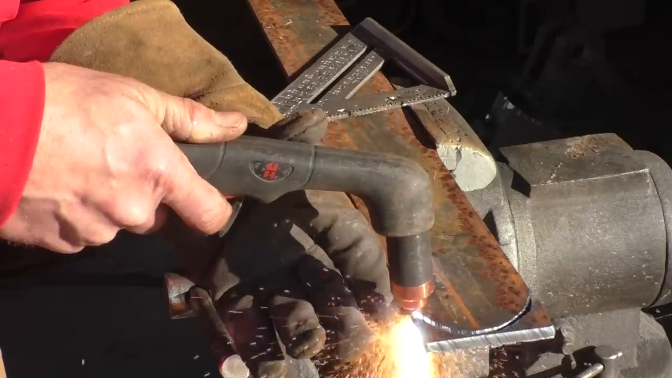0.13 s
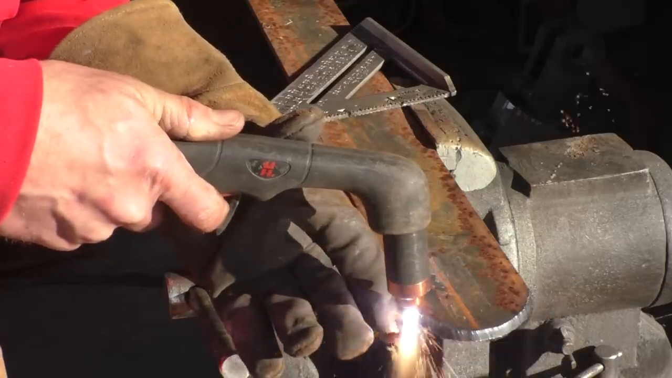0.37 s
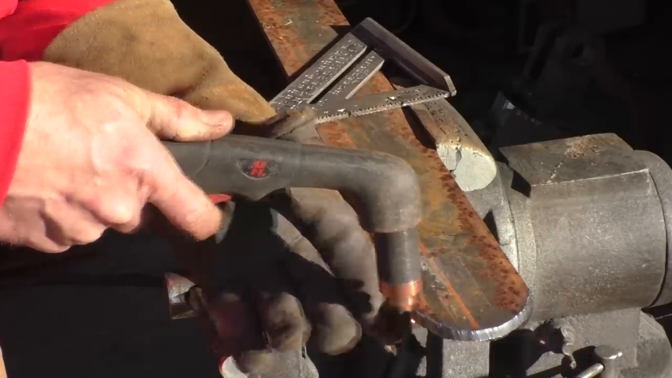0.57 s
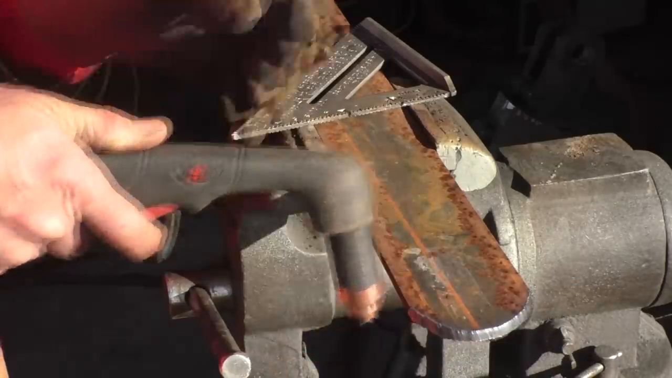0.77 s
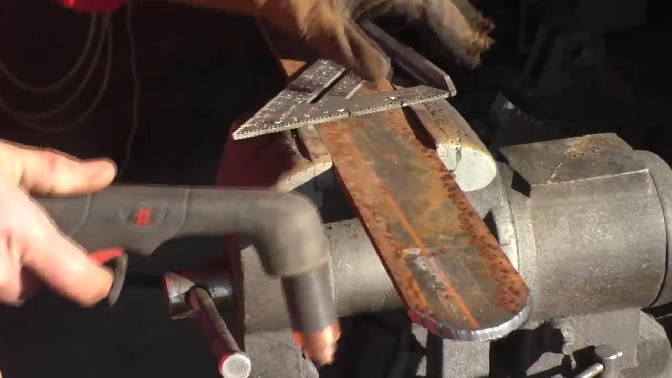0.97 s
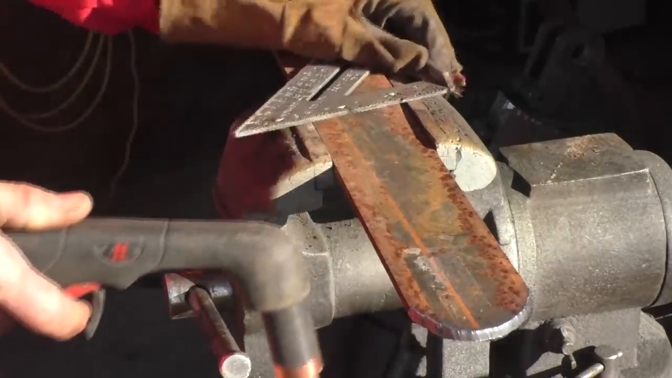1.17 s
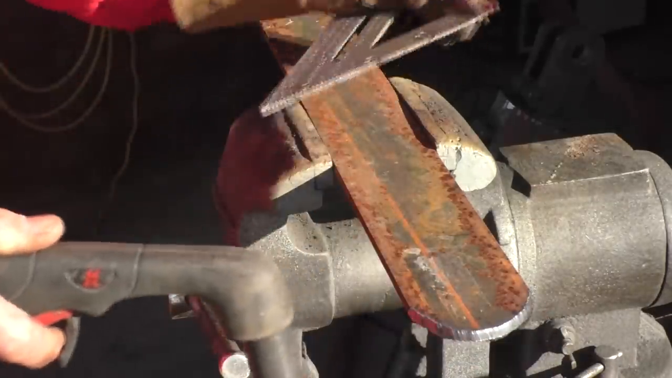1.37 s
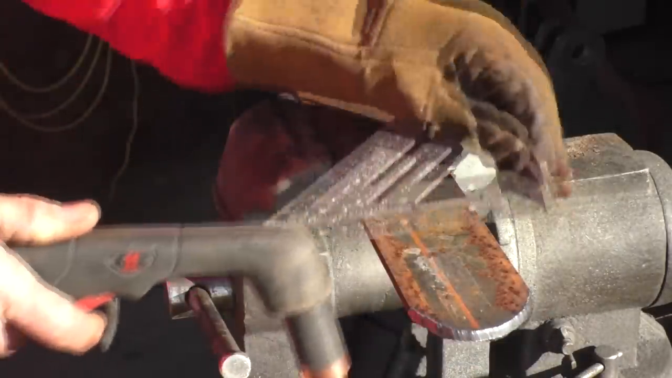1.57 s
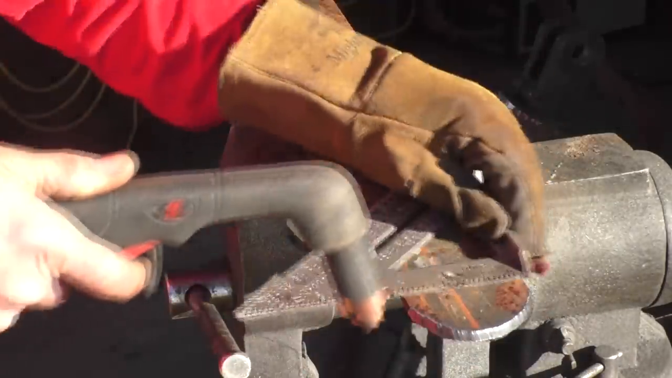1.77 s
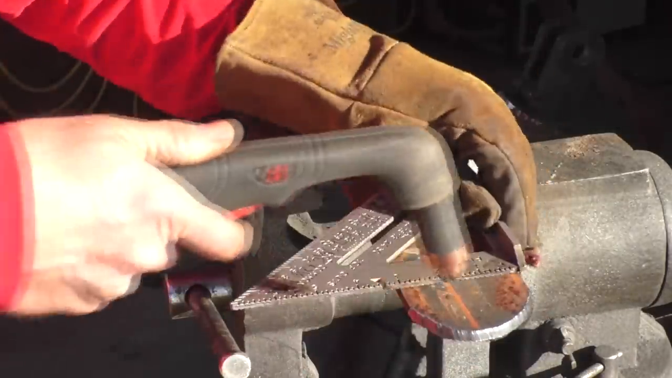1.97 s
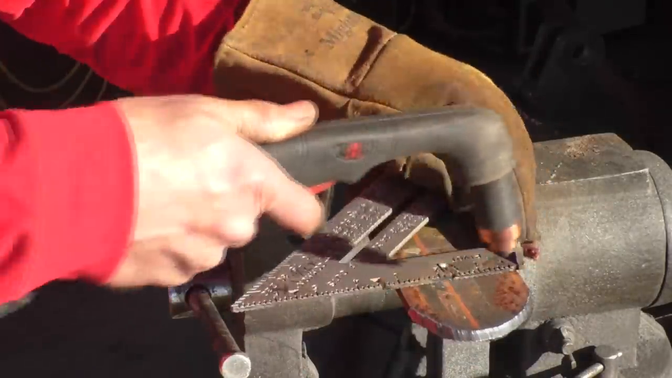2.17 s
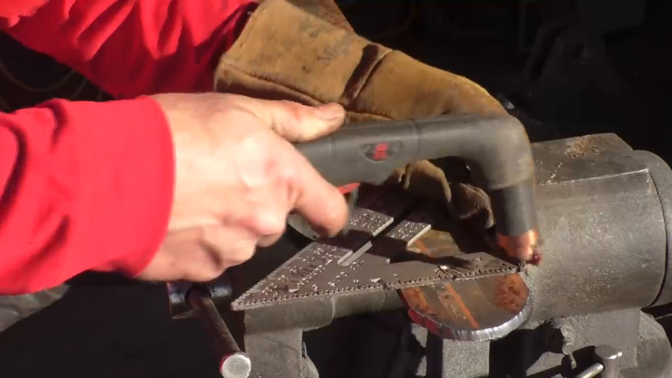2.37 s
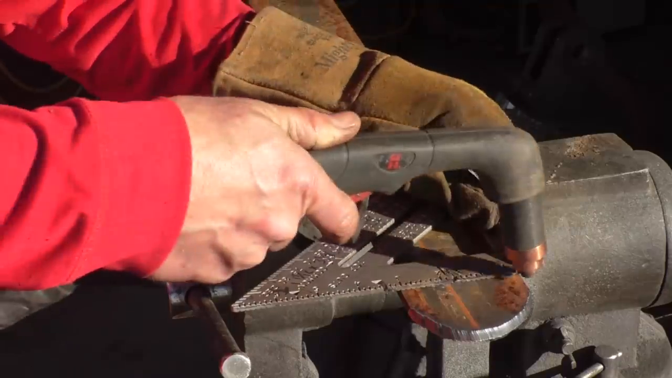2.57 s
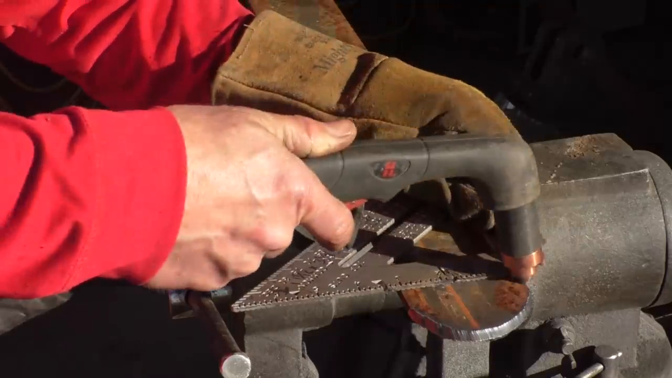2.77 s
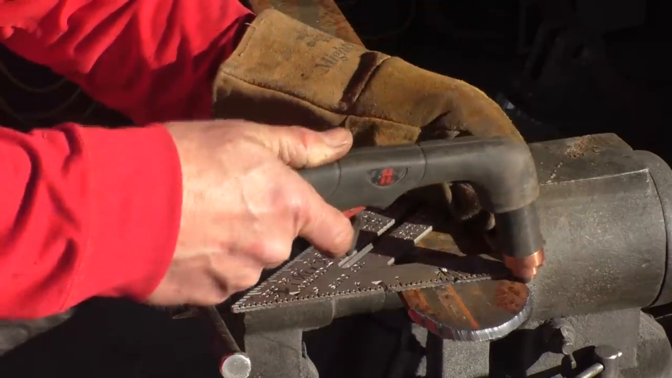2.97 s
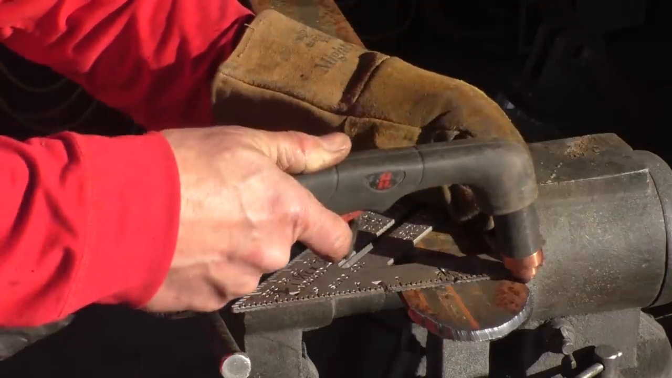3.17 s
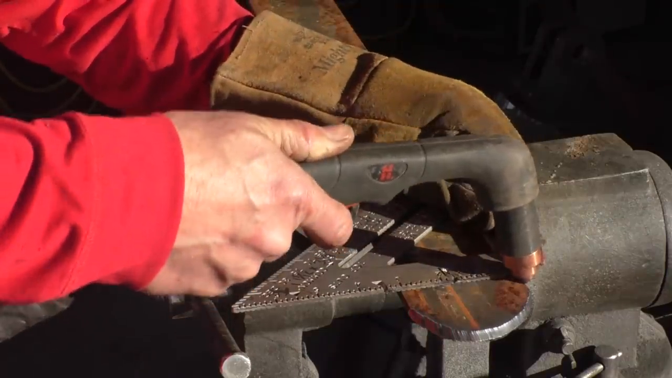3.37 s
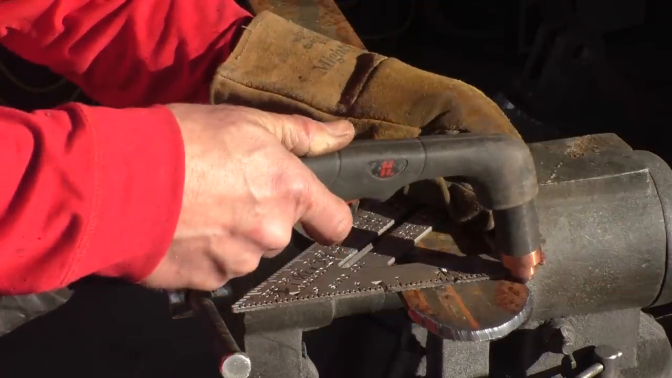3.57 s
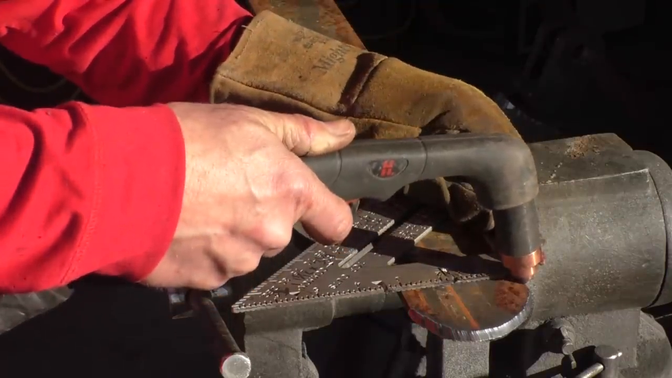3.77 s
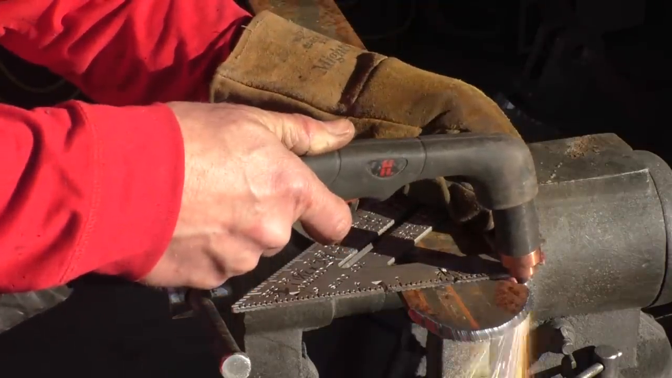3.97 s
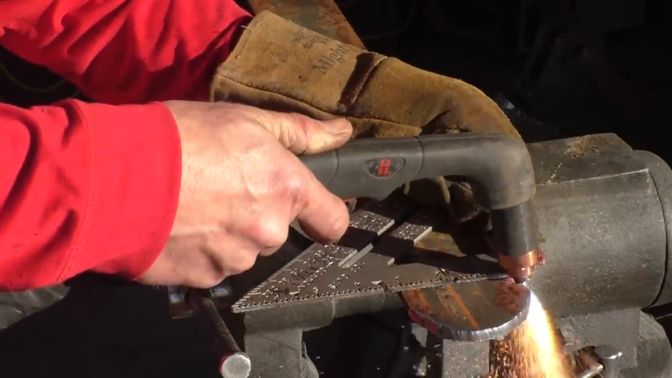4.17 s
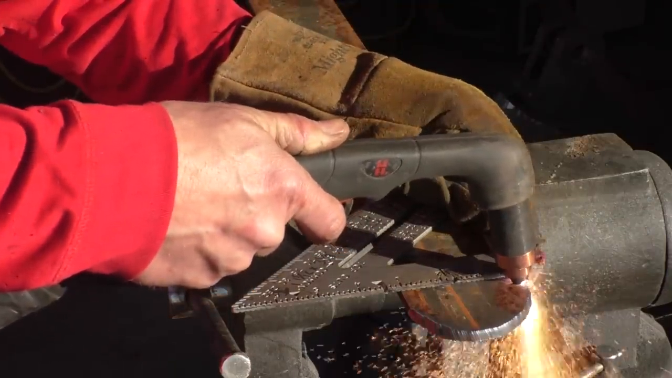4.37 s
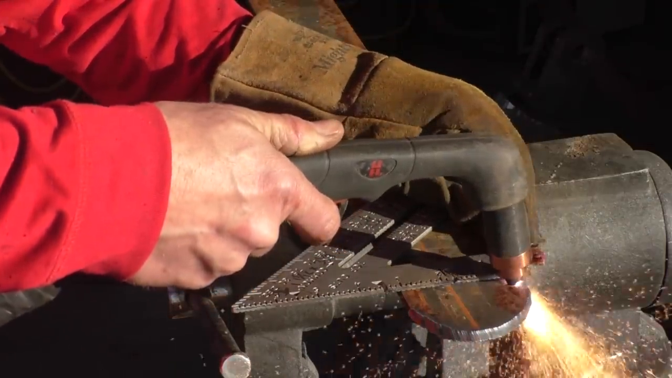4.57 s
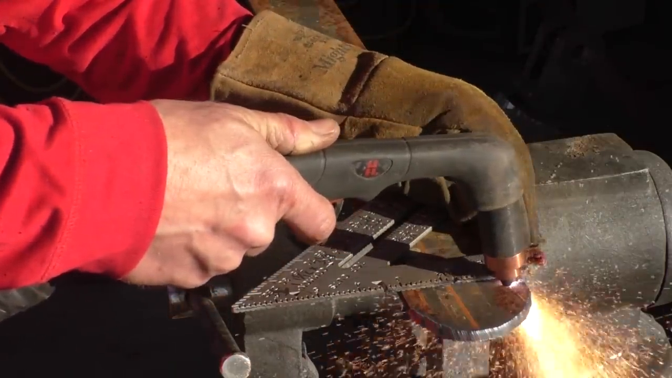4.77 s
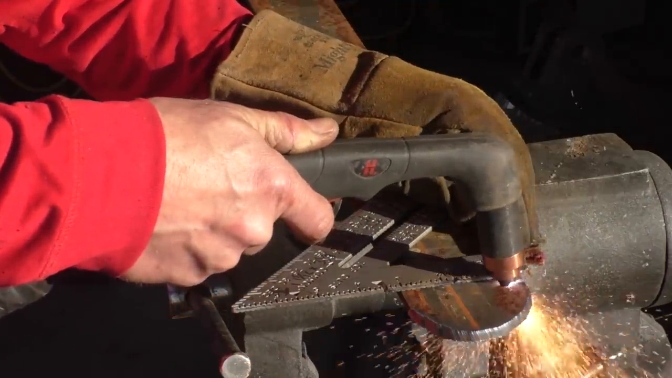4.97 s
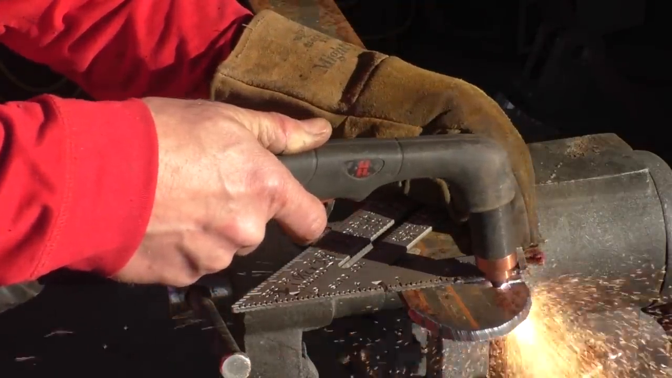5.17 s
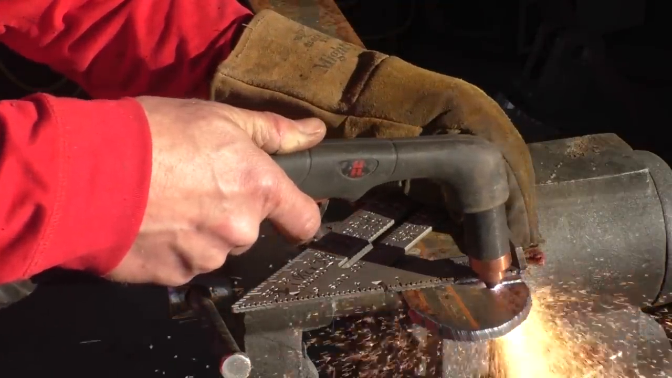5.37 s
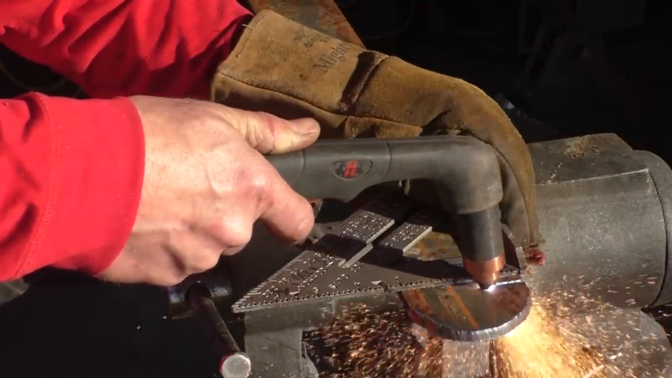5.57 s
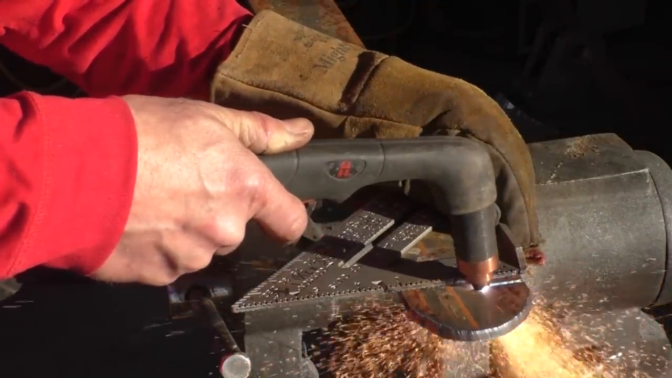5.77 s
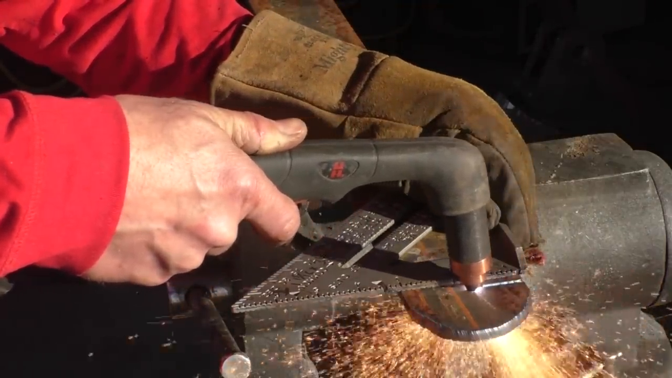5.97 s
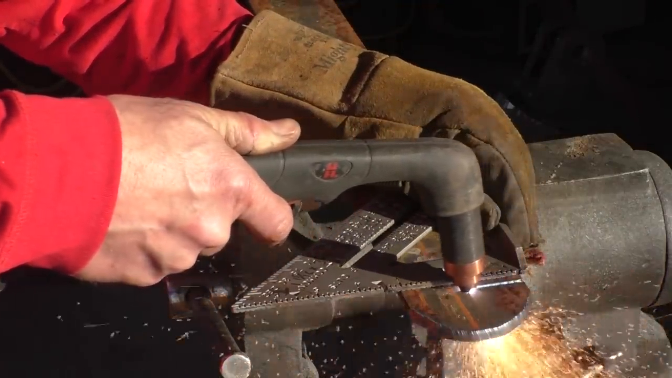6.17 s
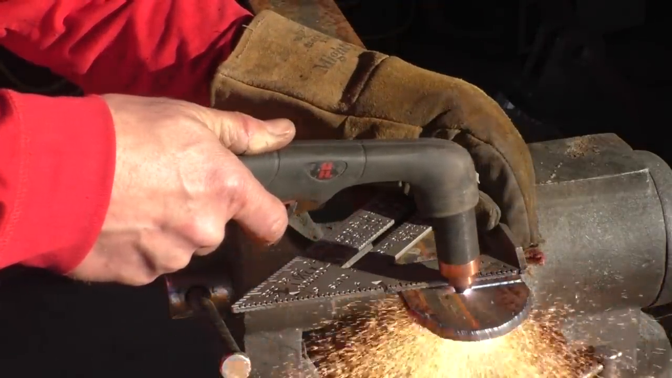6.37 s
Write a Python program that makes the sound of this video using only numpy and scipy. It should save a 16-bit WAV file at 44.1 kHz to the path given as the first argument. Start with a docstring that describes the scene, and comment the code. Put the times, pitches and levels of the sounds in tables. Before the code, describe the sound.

A handheld plasma torch roars and spits through a steel bar, then dies with a pop. Cooling air hisses on over a low machine hum, and a metal square knocks and rings briefly on the bar. The hiss swells with faint whistling, then fades with a puff. The arc snaps alight again and a second crackling cut slowly builds. Everything is close to the microphone in a workshop yard.

```python
"""A hand-held plasma torch roars and spits through a steel bar clamped in a vice, out in a workshop yard.
The arc dies with a pop; cooling air hisses on over the hum of the machine, both swelling slowly back.
A metal square knocks and rings on the bar, air and hum dip again, and the jet sings on the steel's edges.
The valve shuts with a puff and the hose bleeds away; then it opens, the arc strikes with a snap,
the hum ducks and a second cut builds."""
import sys
import numpy as np
from scipy import signal
from scipy.fft import rfft, irfft, next_fast_len
from scipy.io import wavfile

SR = 44100
rng = np.random.default_rng(int(sys.argv[2]) if len(sys.argv) > 2 else 0)


def wrap_up_sound(samples):
    """Save the sound to the file named by the first command line argument, as 16-bit audio."""
    columns = np.atleast_2d(samples).T
    # keep every value between -1 and 1, then stretch to whole-number steps
    tamed = np.clip(columns, -1, 1)
    steps = np.round(tamed * 32767).astype(np.int16)
    wavfile.write(sys.argv[1], SR, steps)


N = 282681
TIME = np.arange(N) / SR
FREQS = np.maximum(np.arange(N // 2 + 1) * SR / N, 1)

# the two cuts: (arc on/s, arc off/s, roar/dB, treble over roar/dB, deep roar over roar/dB, growth/(dB/s))
CUT_PASSES = [(-.2, 0.673, -13, -1.5, -11, -1), (4.022, 6.5, -20, -4, -13, 1.64)]
# tone curve of the arc, one list a cut: (f/Hz, relative density/dB)
ARC_SPECTRA = [
    [(59, -62), (100, -43), (228, -13), (306, -23.5), (386, -14), (508, -13.5), (654, -3), (956, -10.5),
     (1060, -15), (1160, -12), (1460, -4.5), (1800, -6), (3850, 1.5), (7410, -7.5), (15500, -4.5)],
    [(59, -57), (100, -31.5), (228, -14), (355, -18.5), (477, -8.5), (530, -16.5), (590, -8), (825, -9.5),
     (1400, -9.5), (1660, -2.5), (1920, -7), (3850, -2.5), (8230, -11), (13400, -4.5), (15500, -12)],
]
# resonances of the gap between torch, bar and vice, one list a cut: (f/Hz, width/Hz, lift/dB)
GAP_RESONANCES = [
    [(654, 140, -4), (1065, 27, 17), (1490, 170, 4.5), (2060, 310, 6), (2530, 200, 3), (3020, 110, 4),
     (3380, 100, 2.5), (3750, 130, 3), (4000, 170, 4.5), (4560, 200, 1), (5430, 200, 1.5), (12300, 700, 3)],
    [(820, 110, 6), (1120, 65, 3.5), (1284, 37, 8), (1645, 110, 5), (1920, 32, 6), (2293, 58, 7),
     (2416, 20, 10), (2600, 19, 8), (2876, 90, 5), (3190, 38, 6.5), (3792, 50, 6.5), (4570, 63, 4.5),
     (5120, 340, 4.5), (6770, 430, 2.5), (13200, 1400, -1.5)],
]
# surges as molten steel blows through: (t/s, half length/s, roar lift/dB, deep roar lift/dB)
MELT_SURGES = [(0.205, 0.042, 0.1, 5), (.32, .03, 1.5, 3.5), (0.446, 0.044, 1.5, 6.5),
               (4.264, 0.053, 2.2, 4), (4.62, 0.038, -1, 1), (4.77, 0.045, 2, -1.5), (4.86, .03, -0.5, 3.5),
               (5.05, 0.083, 1.5, 0), (5.36, 0.045, .3, 4), (5.467, 0.056, 0.9, 4.5), (5.64, 0.084, 1, 2.5),
               (5.878, 0.09, 1.6, 4), (6.05, 0.021, -0.1, 5), (6.34, 0.041, 1.7, 0.5)]
# partials of the machine's hum: (f/Hz, level over YARD_DB/dB)
HUM_PARTIALS = [(53.8, -15), (80, -12.5), (134.6, -11), (209.9, -16), (275.5, -1), (473.7, -28)]
# tone curve of the yard's rumble: (f/Hz, relative density/dB)
RUMBLE_SPECTRUM = [(15, 12.5), (30, 6), (70, 8), (140, 3.5), (300, 1.5), (600, -0.5), (1000, -5.5),
                   (2000, -10.5), (4000, -41), (10000, -52)]
# air and hum duck at the loud moments: (t/s, fall/s, depth/dB, wait/s, recovery/(dB/s))
BED_DIPS = [(-.05, .02, -20.5, 0.88, 16), (1.775, 0.056, -14.5, 0.72, 10), (4.025, 0.039, -24, .2, 3)]
# single electric snaps: (t/s, peak/dB, f/Hz, decay/cycles)
SPARK_SNAPS = [(.312, 3, 5030, 2.2), (.516, -1, 4970, 1.8), (0.6676, -11.5, 259, 4.2),
               (3.9755, -2.5, 2650, 2.7), (4.0257, -0.5, 1480, 1.2), (4.0365, -3, 4970, 3.8)]
# pops as the arc dies, strikes and spits: (t/s, level/dB, t60/s, low edge/Hz, high edge/Hz)
ARC_POPS = [(0.666, -7.5, 0.072, 175, 1530), (0.676, -23.5, 0.37, 170, 2400),
            (4.0248, -14.5, 0.06, 612, 13000), (4.140, -16.5, 0.17, 600, 4500)]
# tone curve of the free air jet: (f/Hz, relative density/dB)
AIR_SPECTRUM = [(200, -32), (500, -18), (1000, -14.5), (2000, -9), (3000, -5), (4000, -2), (5500, -4),
                (7000, -4), (9200, -2), (10400, -5.5), (12000, -0.5), (13400, 0.5), (14500, -4),
                (15800, -5)]
# the nozzle is brought over the bar and set down: (t/s, hiss/dB, treble over hiss/dB, splash over hiss/dB)
NOZZLE_MOVES = [(1.8, -10.5, -1.5, -12), (1.88, -11, -3, -8), (2.0, -8.5, -0.5, -9),
                (2.22, -4.5, -6.5, -10.5), (2.33, -4, -2.5, -9), (2.48, -5, 1.5, -8),
                (2.65, -7.5, -1.5, -11), (3.0, -10.5, 0.5, -9.5), (3.45, -13, 0.7, -9.5)]
# breathy tones where the jet meets an edge: (start/s, end/s, f/Hz, nominal width/Hz, level at full swell/dB)
EDGE_BANDS = [(.7, 2.16, 13000, 1150, -16.5), (2.086, 2.176, 3150, 2580, -4), (2.093, 2.16, 3500, 160, -8),
              (2.247, 2.354, 2560, 220, -11), (2.24, 2.45, 3440, 330, -16), (2.38, 2.673, 3980, 160, -11),
              (2.7, 3.53, 11800, 300, -21), (2.8, 3.55, 13300, 230, -23.5), (2.9, 3.73, 5100, 240, -17),
              (3.74, 3.9, 4350, 150, -51), (2.05, 2.7, 1710, 170, -22)]
# the square knocks and skids on the bar: (t/s, level/dB, hardest bite/Hz, skid t60/s, skid level/dB)
SQUARE_KNOCKS = [(.797, -41, 1800, 0.0087, -31), (1.234, -30, 1000, .08, -32), (1.792, -15, 2740, 0.1, -14),
                 (1.842, -11.5, 4900, 0.031, -10), (1.939, -44, 1900, 0.1, -23.5)]
# ringing modes of the square: (f/Hz, level over knock/dB, t60/s)
SQUARE_MODES = [(480, -24, 0.83), (1255, -11, 0.39), (1750, -12, 0.098), (1950, -12, .06),
                (2460, -8.5, 0.12), (2960, -3, 0.06), (4050, 2, 0.033), (4240, -16, 0.063),
                (5690, -5, 0.03), (6840, -16, 0.055), (7300, -14, 0.033)]
# soft wind gusts: (t/s, half length/s, f/Hz, level/dB)
WIND_GUSTS = [(1.72, 0.059, 65, -45), (2.686, 0.075, 15, -36), (3.073, .05, 50, -39),
              (3.834, 0.041, 8.3, -38)]
# the air valve shuts, then opens: (t/s, rise/s, hold/s, rush t60/s, tone t60/s, tone/dB, rush/dB)
VALVE_PUFFS = [(3.451, 0.018, 0.018, 0.58, 0.58, -27, -19), (3.9434, 0.003, 0.025, 0.22, 0.068, -20, -26.5)]
# tone curve of a puff's rush: (f/Hz, relative density/dB)
PUFF_SPECTRUM = [(60, -14), (140, 1), (250, 0), (500, 4.5), (930, 2.5), (1300, -2), (1800, -1), (3000, -2),
                 (6000, -19), (12000, -32)]

FLARE_DB, FLARE_S = 2.5, 0.086   # a freshly struck arc flares up, then settles
TREBLE_GROWTH, DEEP_GROWTH = 1, 0.59   # extra shares of a cut's growth in its top and bottom end
YARD_DB = -31   # fader for machine and yard at full swell
AIR_OFF_S, AIR_ON_S = 3.468, 3.942   # the valve shuts and opens again
BLEED_DB, BLEED_S, BLEED_CURVE = 33, 0.42, 1.94   # the hiss fades ever faster: this much after this long
REFILL_DB, REFILL_DB_PER_S = 26, 112   # loss at the moment of opening, and how fast it is made up
TREBLE_LOSS, SPLASH_LOSS = 1.44, 0.71   # multiples of the pressure loss in treble and splash
CUTOFF_HZ = 15800


def from_db(db):
    """Decibels to gain."""
    return 10 ** (np.asarray(db) / 20)


def rms_one(x):
    """Scale to unit power."""
    return x / np.sqrt(np.mean(x ** 2) + 1e-20)


def filtered(x, gain):
    """Apply an EQ curve given at FREQS."""
    size = next_fast_len(N)
    bins_hz = np.arange(size // 2 + 1) * SR / size
    return irfft(rfft(x, size) * np.interp(bins_hz, FREQS, gain), size)[:N]


def band(x, gain):
    """The part of a sound that an EQ curve lets through, at unit power."""
    return rms_one(filtered(x, gain))


def bell(hz, width_hz):
    """A bell curve at FREQS: 1 at the centre, 0.5 half a width away."""
    return 1 / (1 + (2 * (FREQS - hz) / width_hz) ** 2)


def below(edge_hz):
    """A crossover: gain 1 under the edge, 0 over it."""
    return 1 / (1 + (FREQS / edge_hz) ** 10)


def colour(points, peaks=()):
    """An EQ curve through the points, lifted by resonances and falling 18 dB an octave at the bottom."""
    hz, db = np.transpose(points)
    curve_db = np.interp(np.log(FREQS), np.log(hz), db) - 18 * np.maximum(np.log2(hz[0] / FREQS), 0)
    return from_db(curve_db + sum(lift * bell(centre, width) for centre, width, lift in peaks))


def noise(gain):
    """Coloured noise at unit power."""
    return band(rng.standard_normal(N), gain)


def drift(rate_hz):
    """A slow random wobble with a spread of 1."""
    return noise(1 / (1 + (FREQS / rate_hz) ** 2))


def turbulence(sparks_per_s, spark_db, spread_db):
    """White jet noise peppered with tiny snaps of uneven size."""
    sizes = from_db(spread_db * np.minimum(rng.exponential(1, N), 4)) * rng.choice([-1, 1], N)
    crackle = sizes * (rng.random(N) < sparks_per_s / SR)
    return rms_one(rng.standard_normal(N) + from_db(spark_db) * rms_one(crackle))


def echoes(x, echo_db, longest_s, count=14):
    """Bar, vice, bench and ground throw back short echoes that comb the sound, less so in the treble."""
    out = np.zeros(N)
    for place, sign in zip(rng.uniform(.1, 1, count), rng.choice([-1, 1], count)):
        lag = max(int(place * longest_s * SR), 1)
        out[lag:] += sign * x[:-lag] / np.sqrt(count)
    return x + from_db(echo_db) * signal.sosfilt(signal.butter(1, 5000, fs=SR, output="sos"), out)


def arc():
    """The plasma jet roars and spits through the kerf in three fluttering bands: deep, roar and sizzle."""
    out, low, high = np.zeros(N), below(1410), 1 - below(7300)
    surge_db, deep_surge_db = surges()
    for cut, spectrum, peaks in zip(CUT_PASSES, ARC_SPECTRA, GAP_RESONANCES):
        on, off, roar_db, treble_db, deep_db, growth = cut
        age = np.clip(TIME - on, 0, off - on)
        grown_db, flare_db = growth * age, FLARE_DB * np.exp(-age / FLARE_S)
        jet = turbulence(sparks_per_s=630, spark_db=-14.5, spread_db=6)
        jet = echoes(jet, echo_db=-9, longest_s=.022)
        eq = colour(spectrum, peaks)
        deep = band(jet, eq * low)
        deep *= from_db(deep_db + DEEP_GROWTH * grown_db + deep_surge_db + 1.3 * drift(25))
        roar = band(jet, eq * (1 - low - high)) * from_db(surge_db + 0.4 * drift(22))
        sizzle = band(jet, eq * high) * from_db(treble_db + TREBLE_GROWTH * grown_db + 0.57 * drift(30))
        burning = np.clip((TIME - on) / 0.00085, 0, 1) * np.exp(-np.maximum(TIME - off, 0) / 0.0044)
        out += burning * from_db(roar_db + grown_db + flare_db) * (deep + roar + sizzle)
    return out


def surges():
    """Molten steel blows through: soft bumps, in dB, on the roar and on the deep roar."""
    bumps = np.array([np.exp(-((TIME - at) / length) ** 2) for at, length, _, _ in MELT_SURGES])
    lifts_db = np.array(MELT_SURGES)[:, 2:]
    return lifts_db.T @ bumps


def yard():
    """Fan and mains hum of the machine waver over a low rumble."""
    clock = TIME + np.cumsum(0.0041 * drift(5)) / SR   # all partials bend in pitch together
    hum = np.zeros(N)
    for hz, db in HUM_PARTIALS:
        amplitude = np.sqrt(2) * from_db(db + 0.95 * drift(5.9))
        hum += amplitude * np.sin(2 * np.pi * (hz * clock + rng.random()))
    rumble = from_db(-2.2) * noise(colour(RUMBLE_SPECTRUM))
    return from_db(YARD_DB) * (hum + rumble)


def swell_db():
    """Fader ride on the bed of air and hum: each dip falls quickly, waits, then climbs steadily."""
    level = np.zeros(N)
    for at, fall, depth_db, wait, recovery in BED_DIPS:
        fallen = np.clip((TIME - at) / fall, 0, 1)
        climbing = np.minimum(depth_db + recovery * np.maximum(TIME - at - fall - wait, 0), 0)
        level = (1 - fallen) * level + fallen * climbing
    return level


def snaps():
    """A spark jumps or the arc breaks: one sharp swing of pressure that dies within a few cycles."""
    out, age = np.zeros(N), TIME[:SR // 50]
    for at, db, hz, cycles in SPARK_SNAPS:
        first, turns = int(at * SR), age * hz
        swing = turns * from_db(-60 * turns / cycles) * np.sin(2 * np.pi * turns)
        out[first:first + len(age)] -= from_db(db) * swing / np.abs(swing).max()
    return out


def burst(at, t60, low_hz, high_hz):
    """A band of noise with a hard attack and a dying tail."""
    fading = (TIME >= at) * from_db(-60 * np.clip((TIME - at) / t60, 0, 4))
    bandpass = signal.butter(2, [low_hz, min(high_hz, .45 * SR)], "band", fs=SR, output="sos")
    makeup = np.sqrt(SR / 2 / (high_hz - low_hz))
    return makeup * signal.sosfilt(bandpass, fading * rng.standard_normal(N) + 1e-18)


def pops():
    """The gas in the kerf expands or collapses at once."""
    return sum(from_db(db) * burst(at, t60, low_hz, high_hz) for at, db, t60, low_hz, high_hz in ARC_POPS)


def air():
    """Cooling air hisses between the cuts, with a lower splash off the steel; it dulls as pressure falls."""
    times, *curves = np.transpose(NOZZLE_MOVES)
    hiss_db, treble_db, splash_db = (np.interp(TIME, times, curve) for curve in curves)
    loss_db = pressure_loss_db()
    jet = turbulence(sparks_per_s=910, spark_db=-34, spread_db=8)
    jet = echoes(jet, echo_db=-8.5, longest_s=.012)
    eq, low, high = colour(AIR_SPECTRUM), below(2675), 1 - below(6140)
    hiss = band(jet, eq * (1 - low - high)) * from_db(-loss_db)
    treble = band(jet, eq * high) * from_db(treble_db - TREBLE_LOSS * loss_db)
    splash = band(jet, eq * low) * from_db(splash_db - SPLASH_LOSS * loss_db)
    between_cuts = (TIME > CUT_PASSES[0][1]) & (TIME < CUT_PASSES[1][0])
    return between_cuts * from_db(hiss_db + 0.5 * drift(25)) * (hiss + treble + splash)


def edge_tones():
    """Breathy bands of the jet fade in and out while it plays on an edge."""
    out = np.zeros(N)
    for start, end, hz, width_hz, db in EDGE_BANDS:
        fade = np.clip(np.minimum(TIME - start, end - TIME) / (0.22 * (end - start)), 0, 1)
        out += from_db(db) * fade * noise(bell(hz, 1.12 * width_hz))
    return out


def square(bite_db=10, bite_octaves=0.32):
    """Each knock rings the metal square, most of all the modes near its bite, and the edge skids briefly."""
    out, age = np.zeros(N), TIME[:SR // 2]
    for at, db, bite_hz, skid_t60, skid_db in SQUARE_KNOCKS:
        first = int(at * SR)
        for hz, mode_db, t60 in SQUARE_MODES:
            nearness = np.exp(-(np.log2(hz / bite_hz) / bite_octaves) ** 2)
            strength = from_db(db + mode_db + bite_db * nearness + rng.standard_normal())
            ring = from_db(-60 * age / t60) * np.sin(2 * np.pi * hz * age)
            out[first:first + len(age)] += rng.choice([-1, 1]) * strength * ring
        out += from_db(skid_db) * burst(at, skid_t60, low_hz=1030, high_hz=1.6 * bite_hz)
    return out


def gusts():
    """A few soft gusts brush the microphone with low-end thumps."""
    return sum(from_db(db) * np.exp(-((TIME - at) / length) ** 2) * noise(bell(hz, hz))
               for at, length, hz, db in WIND_GUSTS)


def valve(tone_hz=412, wander_hz=38):
    """Each switch of the air gives a rush and a hollow, unsteady tone."""
    out, rush = np.zeros(N), noise(colour(PUFF_SPECTRUM))
    phase = 2 * np.pi * np.cumsum(tone_hz + wander_hz * drift(83)) / SR
    tone = np.sqrt(2) * np.sin(phase) * from_db(2 * drift(80))
    for at, rise, hold, rush_t60, tone_t60, tone_db, rush_db in VALVE_PUFFS:
        attack = np.clip((TIME - at) / rise, 0, 1)
        tail_s = np.maximum(TIME - at - rise - hold, 0)
        out += attack * from_db(tone_db - 60 * tail_s / tone_t60) * tone
        out += attack * from_db(rush_db - 60 * tail_s / rush_t60) * rush
    return out


def pressure_loss_db():
    """The hose bleeds empty once the valve shuts and refills quickly when it opens."""
    bleeding = BLEED_DB * (np.maximum(TIME - AIR_OFF_S, 0) / BLEED_S) ** BLEED_CURVE
    refilling = np.maximum(REFILL_DB - REFILL_DB_PER_S * (TIME - AIR_ON_S), 0)
    return np.where(TIME < AIR_ON_S, bleeding, refilling)


def scene():
    """Everything sits close and dead centre; air and hum dip and swell together as one bed."""
    bed = from_db(swell_db()) * (air() + edge_tones() + yard())
    mix = arc() + bed + square() + pops() + snaps() + valve() + gusts()
    return np.array([mix, mix])


def record(dry):
    """Peaks clip at full scale, then a steep low-pass takes off the very top."""
    lowpass = np.clip((CUTOFF_HZ - FREQS) / 100 + .5, 0, 1)
    return np.array([filtered(channel, lowpass) for channel in np.clip(dry, -1, 1)])


dry = scene()
out = record(dry)
wrap_up_sound(out)
```